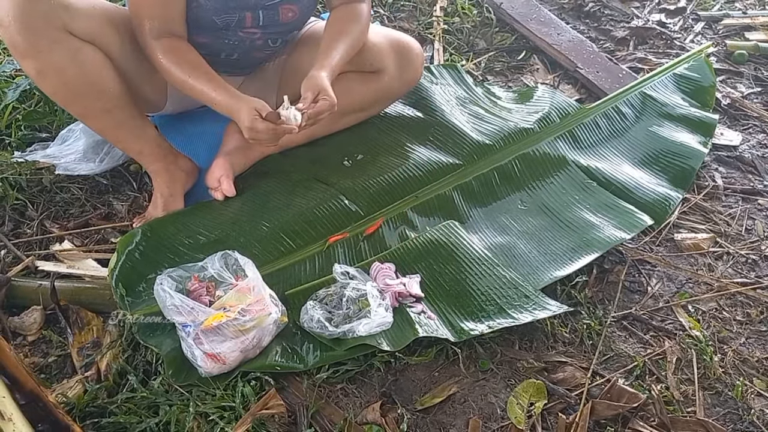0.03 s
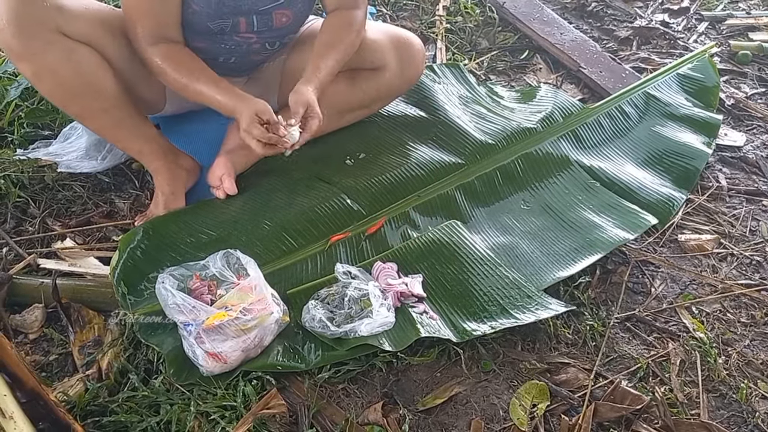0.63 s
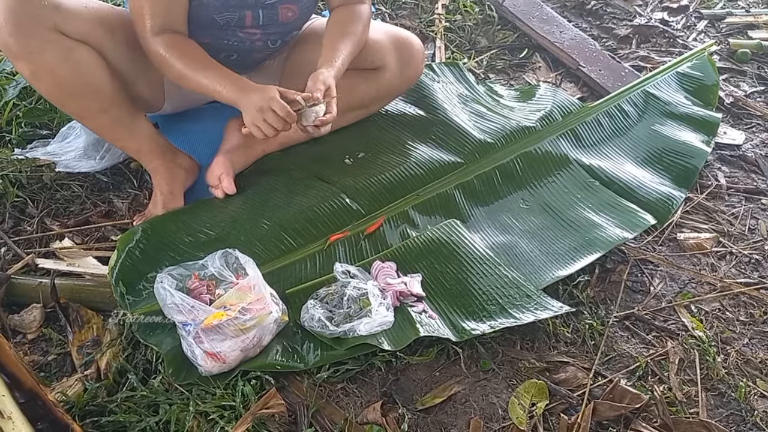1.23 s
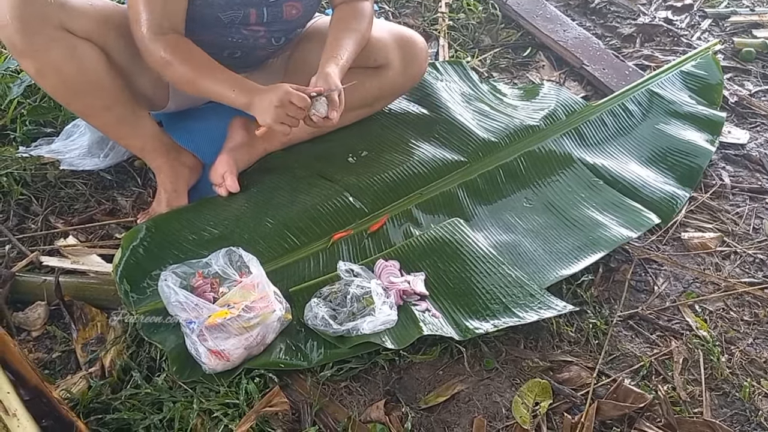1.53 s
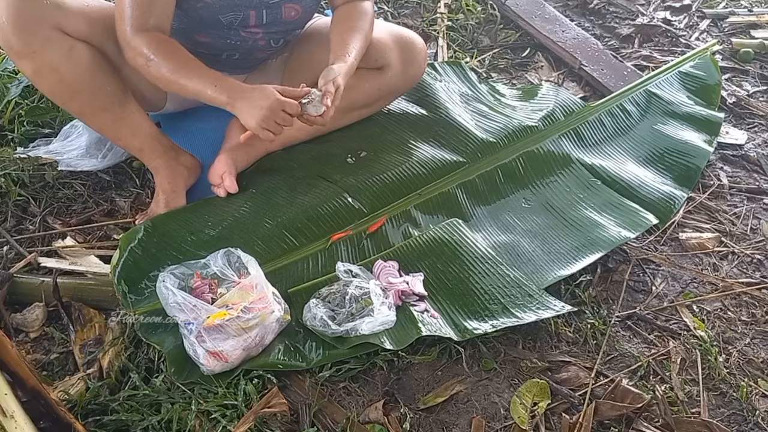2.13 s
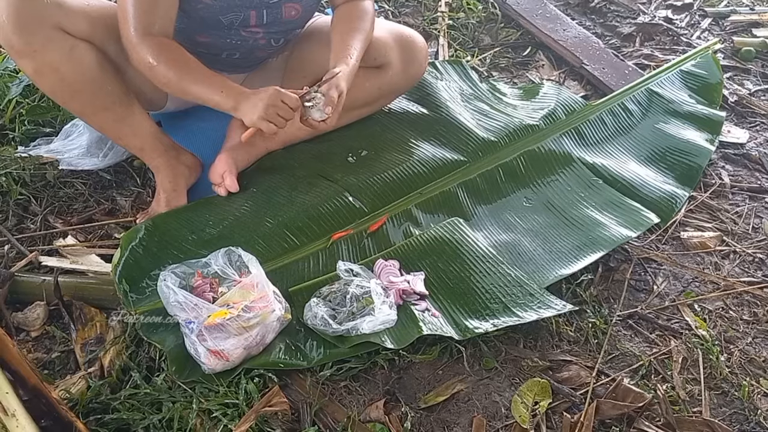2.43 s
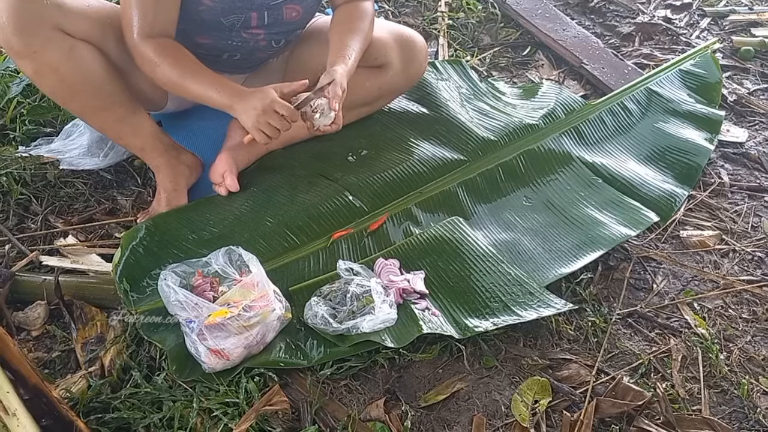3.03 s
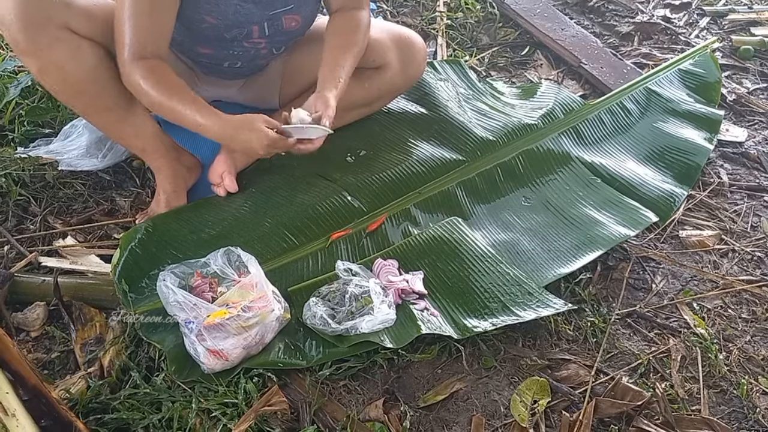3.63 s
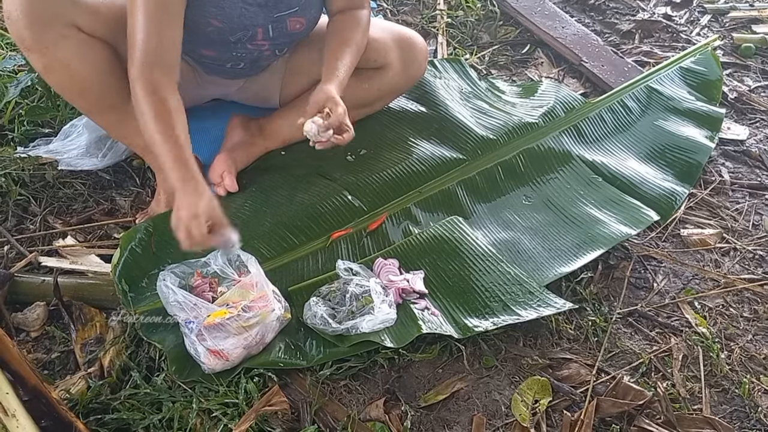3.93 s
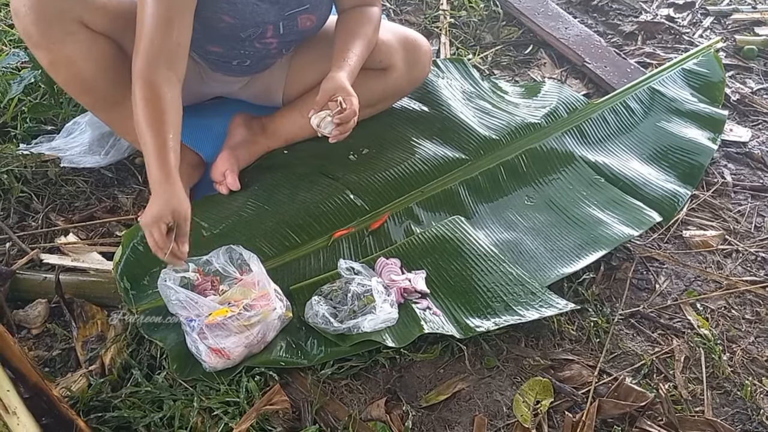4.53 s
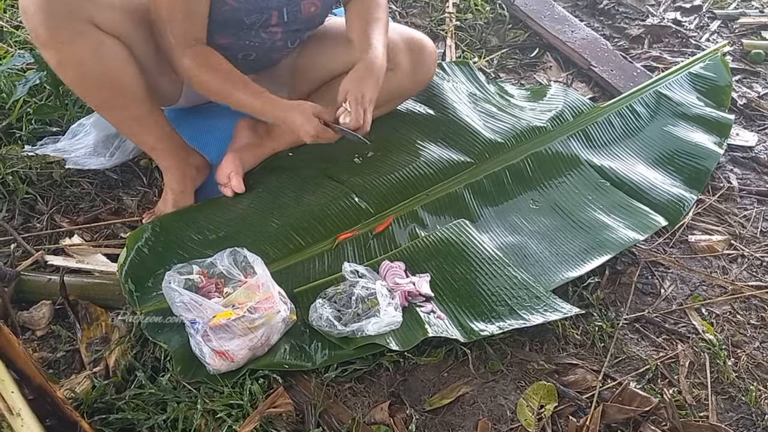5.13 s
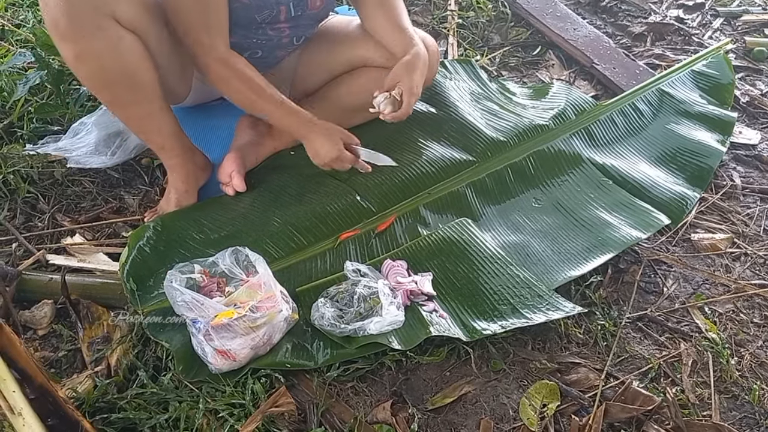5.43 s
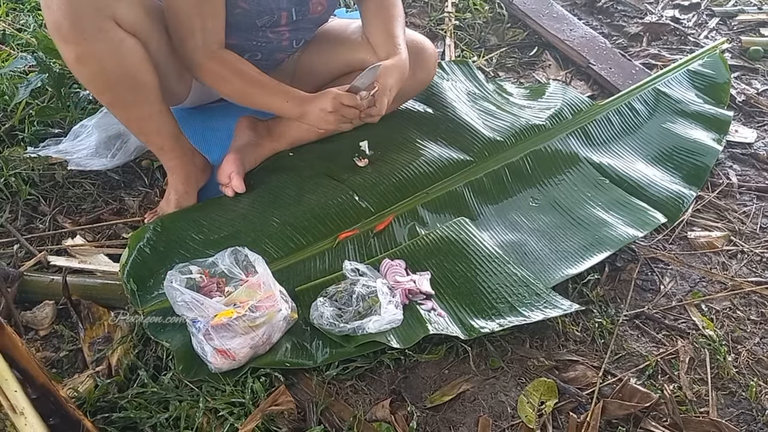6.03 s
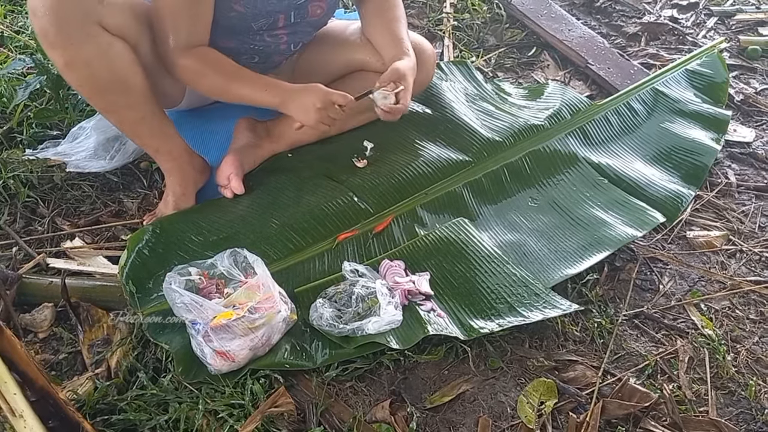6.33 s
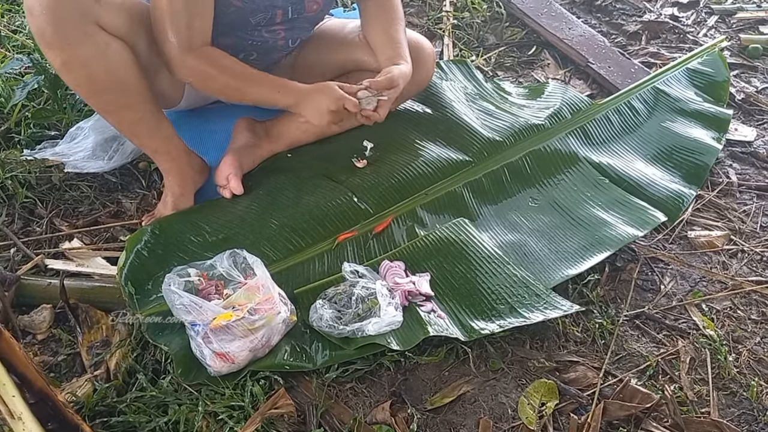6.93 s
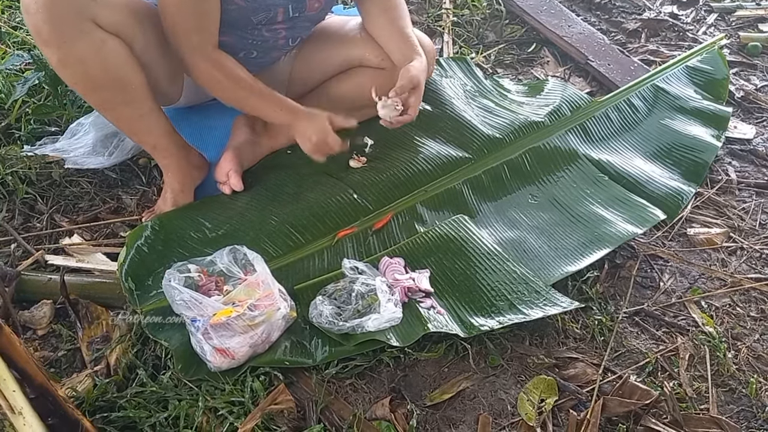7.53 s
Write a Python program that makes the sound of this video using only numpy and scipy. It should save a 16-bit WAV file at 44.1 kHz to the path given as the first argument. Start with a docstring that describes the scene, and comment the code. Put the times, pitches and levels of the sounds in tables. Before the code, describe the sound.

Sharp pops of drips on a taut cover sound close by, over small knife clicks, scrapes and rustling garlic skin outdoors.

```python
"""Outdoors on wet ground, over a low rumble and thin hiss, hands pick and trim a garlic bulb above a
big leaf; its dry skins rustle. From 0.2 s sharp pops, most likely heavy drips on a taut cover, land
close to the microphone about every 0.4 s. The knife nicks and clicks, drops splat on the leaf and a
distant bird chirps. The pops pause from 2.3 to 4.2 s, while scrapes and soft buffets of air come in,
and end at 5.9 s. One far cluck follows at 6.4 s, then the last clicks, scrapes and buffets."""
import sys
import numpy as np
from scipy import signal
from scipy.fft import rfft, irfft, next_fast_len
from scipy.io import wavfile
from scipy.ndimage import uniform_filter1d, map_coordinates

SR = 44100
rng = np.random.default_rng(int(sys.argv[2]) if len(sys.argv) > 2 else 0)


def digitize_waveform(pressure):
    """Quantize a signal to 16-bit integers and store it at the path in sys.argv[1].

    Rows of a 2-D input are taken as channels; values are limited to [-1, 1].
    """
    field = np.atleast_2d(pressure).T
    bounded = np.clip(field, -1, 1)
    quanta = np.round(bounded * 32767).astype(np.int16)
    wavfile.write(sys.argv[1], SR, quanta)


N = 343098
TIME = np.arange(N) / SR
T = np.arange(SR // 5) / SR  # seconds into one short event


def amp(db):
    """Decibels to gain."""
    return 10 ** (np.asarray(db) / 20)


def unit(x):
    """x at rms 1."""
    return x / np.sqrt(np.mean(x ** 2) + 1e-20)


def brief(x, span):
    """x with the energy of span seconds at rms 1."""
    return unit(x) * np.sqrt(span * SR / x.shape[-1])


def fade(t60):
    """An exponential decay, 60 dB down after t60 seconds."""
    return np.exp(-np.log(1000) * T / t60)


def swell(s, half_width):
    """A bell-shaped rise and fall around time s."""
    return np.exp(-np.minimum(((TIME - s) / half_width) ** 2, 40))


def along(points, hz):
    """Interpolate (Hz, value) points on a log axis."""
    f, v = np.transpose(points)
    return np.interp(np.log(hz + 1), np.log(f + 1), v)


def wobble(rate):
    """A smooth random curve, rate knots a second."""
    return map_coordinates(rng.standard_normal(int(N * rate / SR) + 4), [TIME * rate])


def glide(s, hz, bend):
    """Phase of a tone that passes hz at time s, rising by bend * hz a second."""
    return 2 * np.pi * hz * (TIME - s) * (1 + bend * (TIME - s) / 2)


def filtered(x, response):
    """x times a response of frequency."""
    size = next_fast_len(x.shape[-1] + SR // 10)
    hz = np.fft.rfftfreq(size, 1 / SR)
    return irfft(rfft(x, size) * response(hz), size)[..., :x.shape[-1]]


def add(track, s, sound):
    """Mix a sound into a track at time s."""
    start = round(s * SR)
    track[:, start:start + sound.shape[-1]] += sound[:, :N - start]


# likeness of the left and right microphones: f/Hz, correlation
MIC_LIKENESS = [(30, 1), (120, 0.88), (400, 0.7), (1500, 0.052), (4000, 0.045), (12000, .05)]
def noise(spectrum, size=N):
    """Coloured stereo noise of rms 1, alike in the bass and unrelated in the treble."""
    def mid_and_side(hz):
        angle = np.arccos(along(MIC_LIKENESS, hz)) / 2
        return amp(along(spectrum, hz)) * [np.cos(angle), np.sin(angle)]
    mid, side = filtered(rng.standard_normal((2, size)), mid_and_side)
    return unit(np.array([mid + side, mid - side]))


def burst(spectrum, t60, span, grain_db):
    """A puff of coloured noise with a sharp start, broken into tiny cracks."""
    cracks = amp(grain_db * unit(uniform_filter1d(rng.standard_normal(len(T)), size=36)))
    attack = 1 - np.exp(-T / .00021)
    return brief(noise(spectrum, len(T)) * cracks * fade(t60) * attack, span)


def crackle(spectrum, per_s, spread_db, t60):
    """Tiny breaks at random moments, their sizes scattered by spread_db; rms 1."""
    moments = rng.random(N) < per_s / SR
    sizes = amp(spread_db * np.minimum(rng.exponential(size=N), 3))
    return unit(signal.fftconvolve(moments * sizes, fade(t60))[:N] * noise(spectrum))


# slow drift of the background rumble: t/s, level/dB
RUMBLE_DRIFT = [(0.0, -56), (0.84, -54.5), (1.21, -56), (3.1, -52), (3.66, -49.5), (4.48, -57.5),
                (7.78, -50.5)]
# its spectrum: f/Hz, level/dB
RUMBLE_SPECTRUM = [(20, -41), (40, -24.5), (60, -7), (90, -3.5), (125, 1.5), (170, -7.5), (260, -14.5),
                   (400, -28.5), (900, -42), (3000, -81)]
def rumble(gain_db=2.5):
    """The low rumble of the open air, behind everything."""
    drift_db = np.interp(TIME, *np.transpose(RUMBLE_DRIFT))
    return amp(drift_db + gain_db) * noise(RUMBLE_SPECTRUM)


# how busily the fingers work the bulb: t/s, level/dB
FINGER_EFFORT = [(0.0, -67.5), (0.35, -65), (1.13, -66.5), (1.28, -68.5), (1.43, -66), (1.97, -67.5),
                 (2.42, -60.5), (2.64, -65), (3.36, -62.5), (4.03, -63), (4.75, -68.5), (5.41, -63.5),
                 (5.7, -63.5), (6.13, -66), (6.93, -62), (7.15, -65), (7.43, -64), (7.78, -64)]
# spectra of papery skin, finger contact, thin hiss, and rubbing or air: f/Hz, level/dB
SKIN_SPECTRUM = [(600, -20), (2000, -2), (4500, 0), (7000, -2), (10000, -1.5), (13000, 2), (15500, 2)]
CONTACT_SPECTRUM = [(200, -8.5), (500, 4.5), (1000, -5.5), (1800, -1), (3000, -4), (5000, -12), (8000, -22),
                    (16000, -21)]
HISS_SPECTRUM = [(800, -20), (2500, 0), (4500, 1.5), (6200, -2.5), (8000, -.5), (10000, -2.5), (13000, 0),
                 (15500, -.5)]
RUB_AIR_SPECTRUM = [(120, -5), (300, 5), (550, -2), (900, -7.5), (1400, -9.5), (1950, -4), (2600, -11.5),
                    (4000, -21), (8000, -36)]
def rustle(skin_db=1, hiss_db=3, rub_db=2.5, tap_db=-3, air_db=-66, crinkle_growth=1.3):
    """Busier fingers rub, tap and crinkle the skins more; the crinkles come in clumps over a hiss."""
    effort_db = np.interp(TIME, *np.transpose(FINGER_EFFORT))
    clumps_db = 3.5 * wobble(14)
    grip_db = effort_db.mean() + crinkle_growth * (effort_db - effort_db.mean()) + clumps_db
    crinkles = amp(grip_db + skin_db) * crackle(SKIN_SPECTRUM, per_s=220, spread_db=4.5, t60=.013)
    taps = amp(grip_db + tap_db) * crackle(CONTACT_SPECTRUM, per_s=35, spread_db=4, t60=.02)
    hiss = amp(effort_db + hiss_db + 1.3 * wobble(35)) * noise(HISS_SPECTRUM)
    rubbing = amp(effort_db + rub_db + 1.5 * wobble(25)) * noise(RUB_AIR_SPECTRUM)
    air = amp(air_db) * noise(RUB_AIR_SPECTRUM)
    return crinkles + taps + hiss + rubbing + air


# drips close to the microphone: t/s, slap f/Hz, level/dB, treble lift/dB, thump level/dB
COVER_DRIPS = [(0.2446, 1450, -20.5, 2.5, -33.5), (0.658, 1486, -20, -.5, -35),
               (1.0373, 1503, -22.5, 6, -37), (1.4267, 1400, -22, 2, -37), (1.8452, 930, -26.5, 5, -34.5),
               (2.3063, 1450, -22.5, -6, -33.5), (4.1622, 1400, -24, 2.5, -38),
               (4.539, 1097, -22, 6.5, -35), (4.9061, 1350, -22.5, 1, -31), (5.4472, 1180, -20.5, 5, -37),
               (5.8866, 1126, -26, 1, -34.5)]
# modes of the taut cover: f/Hz, relative level/dB, t60/s, left minus right/dB
COVER_MODES = [(125.3, -7.5, 0.048, -0.5), (228, -7.5, 0.082, 0), (289.4, -10, 0.07, 3.5),
               (334.2, -3, 0.046, -2), (411, -5.5, 0.041, -1), (527, -6, 0.043, 5.5),
               (613, -3.5, 0.046, -1), (779, -5.5, 0.027, 7), (876, -4.5, 0.032, -8.5),
               (1005.6, -6.5, 0.044, 10), (1118, -11, 0.027, -7), (1216, -13.5, 0.039, -13.5),
               (1421, -10.5, 0.042, -3), (1568, -12.5, 0.041, 2), (1826, -9.5, 0.019, -4.5),
               (1948, -10.5, 0.024, 9), (2117, -14.5, 0.02, 6.5), (2370, -18, 0.039, 6.5),
               (2870, -25, 0.057, -8.5)]
# spectra of the spray and of any crisp crack: f/Hz, level/dB
SPRAY_SPECTRUM = [(200, -35), (700, -3.5), (1800, 15), (2600, 11), (4000, 4.5), (6000, -2), (8000, -1.5),
                  (10000, -5), (14000, -1.5), (17000, -9)]
CRISP_SPECTRUM = [(800, -19), (2200, 2.5), (4000, 3.5), (7000, -1.5), (12000, -2.5), (16000, -9)]
def drips(span=.026, return_s=.0053, return_db=-10, spray_db=-8.5, crack_db=-23, lag_s=.0002):
    """Each drip slaps one spot; the wave returns from the rim and fills the modes as spray flies."""
    cover, spray = np.zeros((2, N)), np.zeros((2, N))
    sides = np.array([[.5], [-.5]])
    contact = (1 - np.exp(-T / .0004)) * np.exp(-np.minimum(T / .0028, 4) ** 3)
    filling = (1 - np.exp(-T / .0048)) ** 2
    for s, slap_hz, drip_db, lift_db, thump_db in COVER_DRIPS:
        strength = [(285, thump_db), (300, drip_db), (950, drip_db), (1450, drip_db + lift_db)]
        slap = amp(along(strength, slap_hz) - 2) * brief(np.sin(2 * np.pi * slap_hz * T) * contact, span)
        for trip in range(3):
            add(cover, s + trip * return_s, amp(trip * return_db) * slap[None])
        for hz, db, t60, pan_db in COVER_MODES:
            scatter_db, detune, phase = rng.standard_normal(3) * [1.3, .014, 1.7]
            # the modes fall roughly into step when the wave comes back to the struck spot
            ring = np.cos(2 * np.pi * hz * (1 + detune) * (T - return_s) + phase)
            mode_db = along(strength, hz) + db - 1.5 + scatter_db + sides * pan_db
            add(cover, s, amp(mode_db) * brief(ring * fade(t60) * filling, span))
        add(spray, s, amp(drip_db + spray_db) * burst(SPRAY_SPECTRUM, .08, span, grain_db=3))
        add(spray, s, amp(drip_db + crack_db) * burst(CRISP_SPECTRUM, .018, span, grain_db=3.5))
    # the cover lies to the right, so the left microphone hears it later
    return filtered(cover, lambda hz: np.exp(-2j * np.pi * hz * [[lag_s], [0]])) + spray


# decay of the surroundings: f/Hz, t60/s
YARD_DECAY = [(200, 0.21), (700, 0.34), (2000, 0.22), (6000, 0.23), (14000, 0.29)]
def yard(x, block=SR // 3):
    """A short diffuse echo around the microphone, its tail drawn afresh for each block."""
    out = np.zeros((2, N))
    for start in range(0, N, block):
        hz, t, bands = signal.stft(rng.standard_normal((2, block)), SR, nperseg=256)
        decay = amp(-60 * t / along(YARD_DECAY, hz)[:, None])
        build_up = 1 - np.exp(-t / .0055)
        _, tail = signal.istft(bands * decay * build_up, SR, nperseg=256)
        tail /= np.linalg.norm(tail[0])
        add(out, start / SR, signal.fftconvolve(x[:, start:start + block], tail, axes=1))
    return out


def wall(x, delay_s=.05):
    """A far surface returns each pop once, dull and faint."""
    reflection = [(300, -29.5), (650, -28), (1200, -41), (3000, -42)]  # f/Hz, level/dB
    return filtered(x, lambda hz: amp(along(reflection, hz)) * np.exp(-2j * np.pi * hz * delay_s))


# spectra of the knocked bulb and the clicking blade: f/Hz, level/dB
BULB_SPECTRUM = [(30, -23), (80, -6), (200, -1.5), (350, 4.5), (600, -10), (1000, -13), (2500, -57.5)]
BLADE_SPECTRUM = [(300, -23.5), (650, -6.5), (950, 5.5), (1200, -2), (1450, 1), (2200, -5.5), (4000, -20.5),
                  (9000, -46)]
def click(knock_db, blade_db, crisp_db, span=.014):
    """A dull knock of the bulb, a click of the blade and the crisp break of dry skin."""
    return (amp(knock_db) * burst(BULB_SPECTRUM, .041, span, grain_db=-.5)
            + amp(blade_db) * burst(BLADE_SPECTRUM, .028, span, grain_db=.5)
            + amp(crisp_db) * burst(CRISP_SPECTRUM, .039, span, grain_db=1))


# clear nicks, farther off than the cover: t/s, knock level/dB, blade level/dB, crisp level/dB
KNIFE_NICKS = [(0.4236, -52, -45.5, -66.5), (.777, -44, -36.5, -42.5), (1.3267, -71, -63, -55),
               (1.6756, -40, -48, -52.5), (2.0834, -43.5, -50.5, -58.5), (2.595, -41, -61, -45.5),
               (2.7967, -52, -40, -53.5), (2.968, -45.5, -53, -53), (3.47, -70, -43.5, -67.5),
               (3.6073, -43, -51, -71), (3.7626, -40, -52.5, -65), (3.9797, -37.5, -46, -70.5),
               (4.036, -40, -44, -54), (4.0613, -41.5, -41.5, -55), (4.2443, -45, -49, -65),
               (5.068, -46.5, -65, -71), (5.8413, -32.5, -35, -46), (6.051, -70, -60, -48),
               (6.0792, -49, -47.5, -61), (6.237, -72, -72, -53.5), (6.71, -41.5, -36.5, -52),
               (6.747, -32, -40, -40)]
def trimming(ticks_per_s=4, over_effort_db=(7.5, 7.5, 5), spread_db=1.5):
    """Knife and fingers click on the bulb; small stray ticks grow with the fingers' effort."""
    out = np.zeros((2, N))
    for s, *levels_db in KNIFE_NICKS:
        add(out, s, click(*levels_db))
    for slot in range(int(ticks_per_s * N / SR)):
        s = (slot + rng.random()) / ticks_per_s
        effort_db = np.interp(s, *np.transpose(FINGER_EFFORT))
        levels_db = effort_db + np.array(over_effort_db) + spread_db * rng.standard_normal(3)
        add(out, s, click(*levels_db))
    return out


# drops on the leaf below the hands: t/s, level/dB, t60/s
LEAF_DROPS = [(0.7782, -42, 0.084), (1.119, -35, 0.08), (5.6522, -32.5, 0.066), (5.6749, -31, 0.09)]
# their spectrum: f/Hz, level/dB
SPLAT_SPECTRUM = [(500, -23), (1400, -1), (2200, 2.5), (3200, 3), (4500, 7), (6000, 0.5), (10000, 2),
                  (16000, -3)]
def splats(span=.0125):
    """Drops shatter on the wet leaf: a bright puff with a quick tick just inside its start."""
    out = np.zeros((2, N))
    for s, db, t60 in LEAF_DROPS:
        add(out, s, amp(db - .5) * burst(SPLAT_SPECTRUM, t60, span, grain_db=1.5))
        add(out, s + .00098, amp(db - 9.5) * burst(CRISP_SPECTRUM, .008, span, grain_db=-7))
    return out


# distant chirps: t/s, f/Hz, level/dB
BIRD_CHIRPS = [(.842, 2360, -56), (3.083, 2370, -51), (4.796, 2340, -49)]
# harmonics of the cluck: multiple, relative level/dB
CLUCK_HARMONICS = [(1, -3.5), (2, -12), (3, 1), (4, -13.5), (5, -15), (6, -9), (7, -7.5), (9, -21),
                   (11, -19)]
def bird(cluck_s=6.405, cluck_hz=264, cluck_db=-39, flutter_db=3):
    """Far off, tiny rising chirps and one nasal cluck that bends upward; both flutter a little."""
    rasp = 1.1 * wobble(900)
    chirps = sum(amp(db) * swell(s, .015) * np.sin(glide(s, hz, bend=3) + rasp)
                 for s, hz, db in BIRD_CHIRPS)
    phase = glide(cluck_s, cluck_hz, bend=2.7)
    voice = sum(amp(db) * np.cos(k * phase + rng.standard_normal()) for k, db in CLUCK_HARMONICS)
    cluck = amp(cluck_db) * swell(cluck_s, .012) * voice
    flutter = amp(flutter_db * np.array([wobble(300), wobble(280)]))
    return (chirps + cluck) * flutter


# longer strokes over the bulb: t/s, half-width/s, scrape level/dB, peel level/dB
SCRAPE_STROKES = [(2.588, 0.026, -48, -54), (3.271, .022, -57.5, -50.5), (3.696, 0.025, -44.5, -57.5),
                  (3.779, 0.016, -48, -53), (5.026, 0.027, -74, -54), (5.203, 0.052, -60.5, -51),
                  (6.72, .03, -50, -63.5), (6.978, 0.095, -57.5, -50.5), (7.668, 0.063, -50, -63)]
def scrapes():
    """Blade and fingers drag over the bulb and peel off dry skin."""
    drag = sum(amp(db) * swell(s, width) for s, width, db, _ in SCRAPE_STROKES)
    peel = sum(amp(db) * swell(s, width) for s, width, _, db in SCRAPE_STROKES)
    return (drag * crackle(CONTACT_SPECTRUM, per_s=1700, spread_db=8.5, t60=.012)
            + peel * crackle(SKIN_SPECTRUM, per_s=350, spread_db=0, t60=.012))


# puffs of air at the microphone: t/s, half-width/s, level/dB
AIR_BUFFETS = [(3.519, 0.043, -36.5), (3.661, 0.053, -35.5), (5.157, 0.037, -40.5), (7.464, .06, -40.5),
               (7.606, .032, -32.5)]
def buffets(left_db=-13):
    """Soft low buffets of air, mostly on the right microphone port."""
    spectrum = [(20, -28), (45, -12), (80, 6), (130, 1), (220, -12.5), (600, -53)]  # f/Hz, level/dB
    puffs = sum(amp(db) * swell(s, width) for s, width, db in AIR_BUFFETS)
    return puffs * amp([[left_db], [0]]) * noise(spectrum)


def scene():
    """Near pops, farther small sounds and the distant bird share one echo; the rest stays dry."""
    near, farther, distant = drips(), trimming() + splats(), bird()
    pop_send = [(300, -20.5), (1500, -29), (3000, -14), (8000, -14)]  # f/Hz, level/dB
    sent_pops = filtered(near, lambda hz: amp(along(pop_send, hz)))
    echo = yard(sent_pops + amp(-16.5) * farther + amp(-13) * distant)
    return near + wall(near) + farther + distant + echo + rustle() + scrapes() + rumble() + buffets()


def record(dry, top_hz=16000):
    """The recorder rounds off the highest peaks and keeps nothing above its band limit."""
    rounded = dry / (1 + np.abs(dry) ** 8) ** (1 / 8)
    return filtered(rounded, lambda hz: hz < top_hz)


dry = scene()
out = record(dry)
digitize_waveform(out)
```